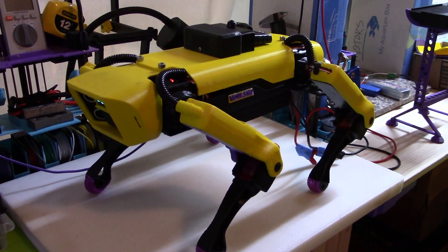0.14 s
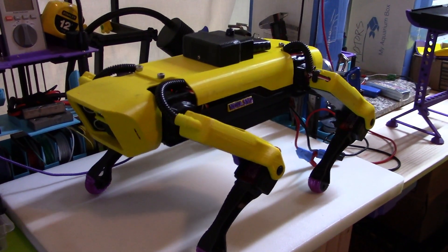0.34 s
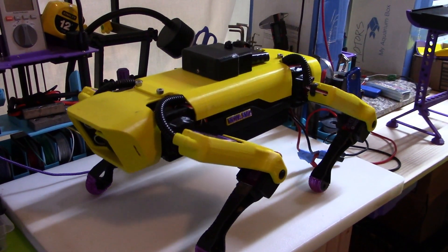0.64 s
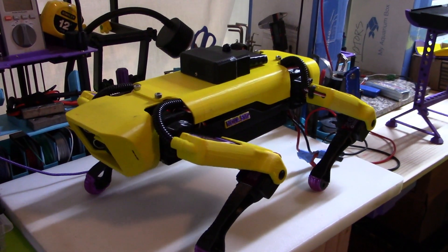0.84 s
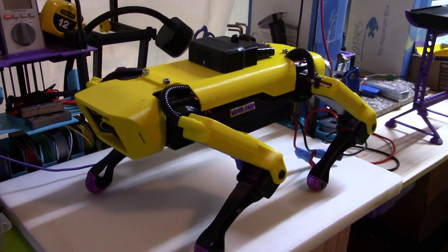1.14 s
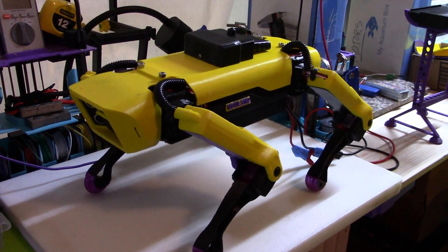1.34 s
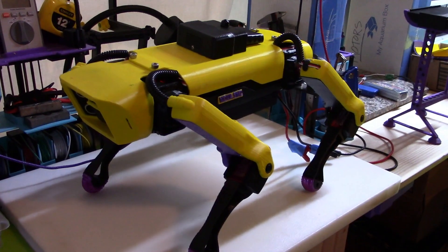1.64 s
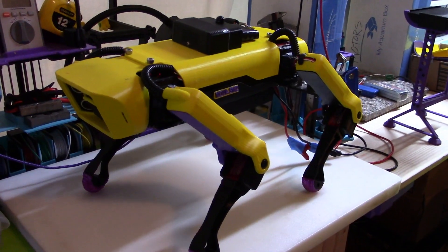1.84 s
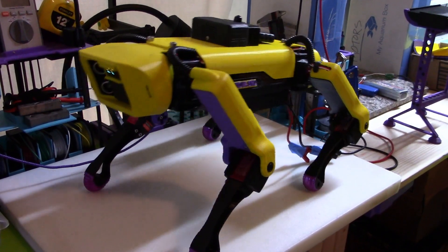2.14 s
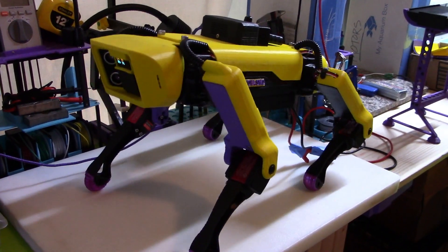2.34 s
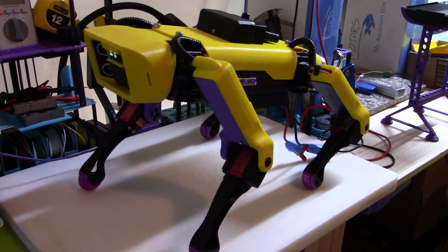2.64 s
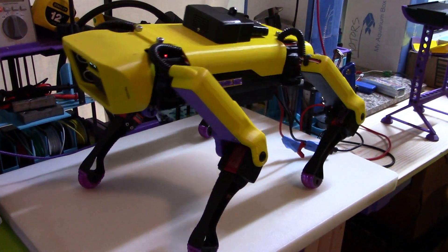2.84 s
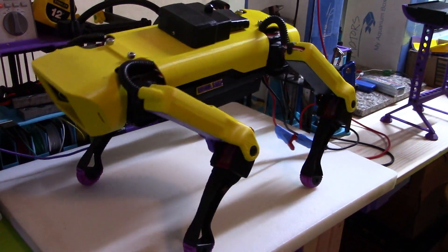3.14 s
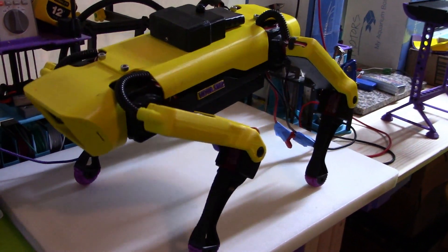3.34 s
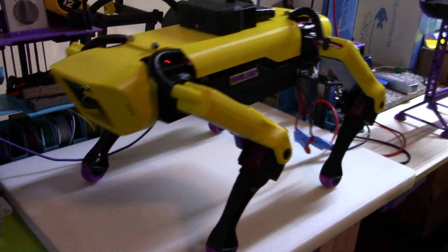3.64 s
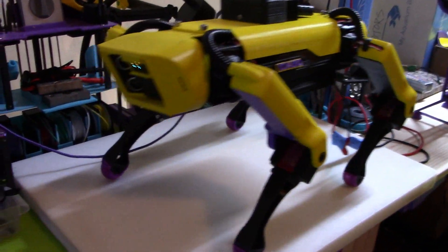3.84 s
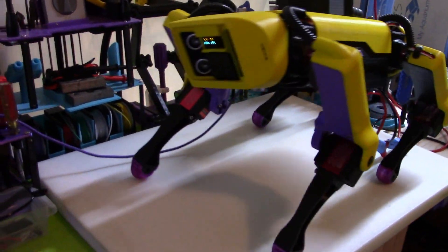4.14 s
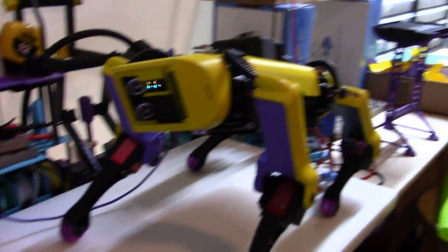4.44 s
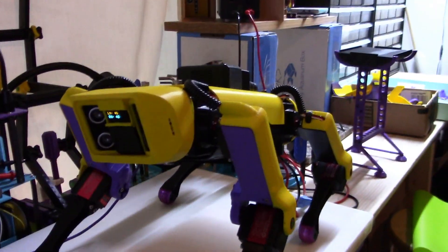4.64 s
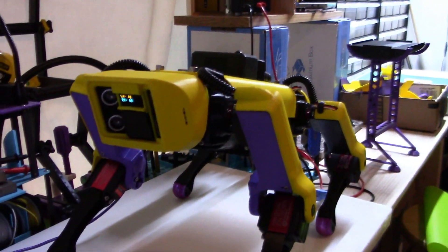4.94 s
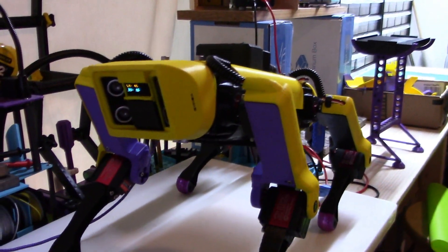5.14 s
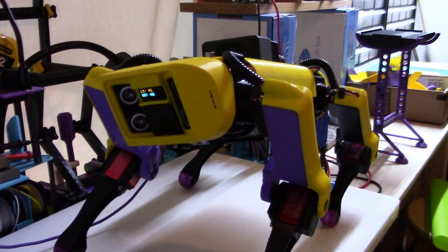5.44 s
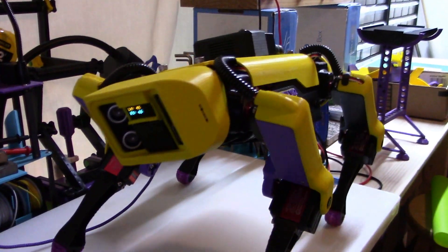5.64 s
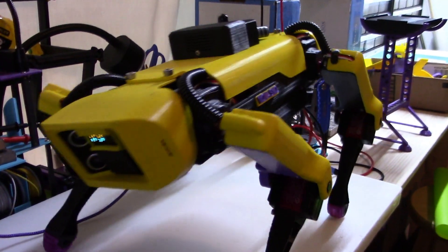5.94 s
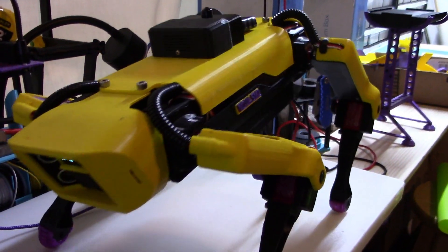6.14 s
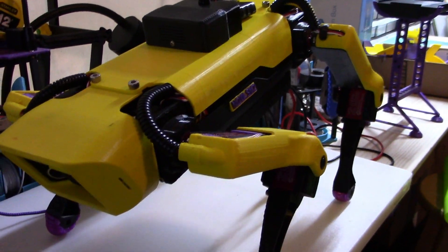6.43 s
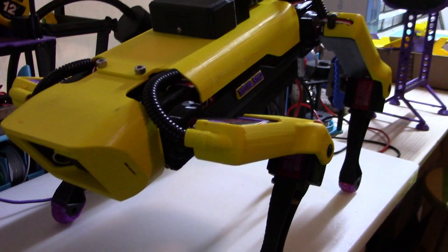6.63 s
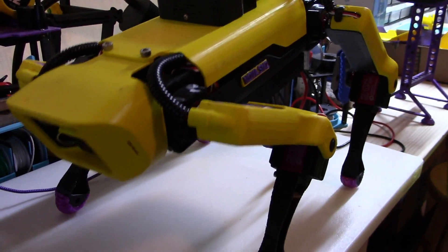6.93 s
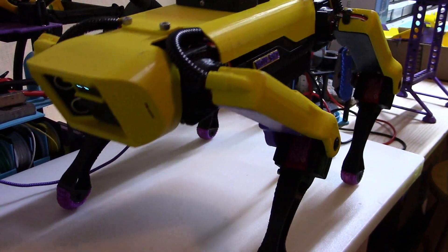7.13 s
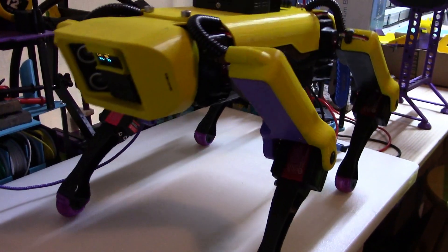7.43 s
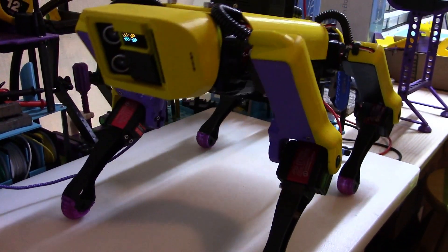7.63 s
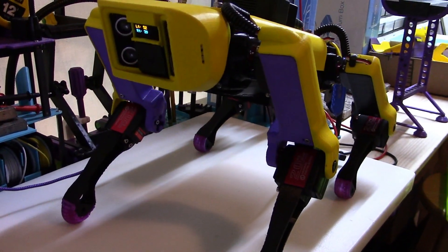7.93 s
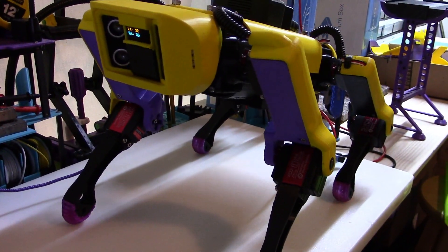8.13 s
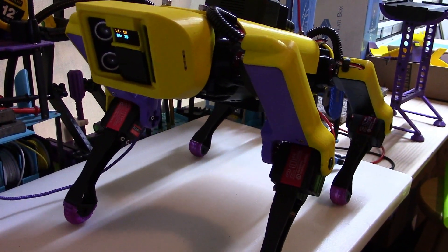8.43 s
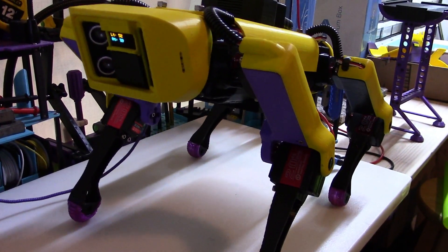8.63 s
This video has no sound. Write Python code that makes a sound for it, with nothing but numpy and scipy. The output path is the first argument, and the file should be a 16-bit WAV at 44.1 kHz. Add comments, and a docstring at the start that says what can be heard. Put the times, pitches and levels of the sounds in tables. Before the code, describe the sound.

Small geared servos whir and rasp in bursts as a plastic robot shifts on a bench, with sharp clicks and faint bird whistles early.

```python
"""In a small room, a four-legged robot crouches, leans and rises on a workbench, heard from close by.
Its geared servos rasp, one burst of tooth noise per motor turn; this drive also excites the plastic shell.
Joints and feet click as short sums of decaying modes in the printed legs.
A songbird whistles faintly outside in gliding sine tones, over the steady filtered noise of the room's air."""
import sys
import numpy as np
from scipy import signal
from scipy.fft import rfft, irfft, next_fast_len
from scipy.io import wavfile
from scipy.ndimage import uniform_filter1d, map_coordinates

SR = 44100
rng = np.random.default_rng(int(sys.argv[2]) if len(sys.argv) > 2 else 0)


def materialize(psi):
    """Save the field psi as 16-bit PCM at rate SR to the path in sys.argv[1].

    A 1-D psi becomes a single channel; in a 2-D psi each row is a channel.
    """
    bounded = np.clip(np.atleast_2d(psi).T, -1, 1)
    quanta = np.round(bounded * 32767).astype(np.int16)
    wavfile.write(sys.argv[1], SR, quanta)


N = 387198  # length [samples]


def amp(db):
    """Logarithmic level: decibels to amplitude gain."""
    return 10 ** (np.asarray(db) / 20)


def unit(x):
    """Mean power: scale a signal to rms 1."""
    return x / np.sqrt(np.mean(x ** 2) + 1e-20)


def along(points, hz):
    """Logarithmic pitch: interpolate (frequency, value) points on a log-frequency axis."""
    f, v = np.transpose(points)
    return np.interp(np.log(hz + 1), np.log(f + 1), v)


def wobble(rate):
    """Slow random modulation: a smooth curve through normal random knots, rate knots a second."""
    knots = rng.standard_normal(int(N * rate / SR) + 4)
    return map_coordinates(knots, [np.arange(N) * rate / SR])


def coloured(x, spectrum):
    """Minimum-phase filtering: a causal body with the given spectrum passes x; the result has rms 1."""
    m = 2 * next_fast_len(N // 2 + SR // 4)
    log_gain = np.log(amp(along(spectrum, np.fft.rfftfreq(m, 1 / SR))))
    # folding the cepstrum onto positive times makes the filter causal
    cepstrum = irfft(log_gain, m)
    cepstrum[1:m // 2] *= 2
    cepstrum[m // 2 + 1:] = 0
    response = np.exp(rfft(cepstrum))
    return unit(irfft(rfft(x, m) * response, m)[:N])


def highpassed(x, hz):
    """High-pass filtering: a third-order Butterworth slope weakens what lies below hz."""
    return signal.sosfilt(signal.butter(3, hz, "highpass", fs=SR, output="sos"), x)


# Spectrum of the steady air noise: (frequency [Hz], relative density [dB per Hz])
AIR_SPECTRUM = [(100, -17), (180, -12), (260, 1.5), (420, 0), (540, 2.5), (1400, -1), (2000, -2),
                (2800, -2.5), (4000, -10.5), (8000, -16), (15000, -24)]


def air():
    """Broadband noise and amplitude modulation: coloured air noise with a faint pulsing chirr near 2 kHz."""
    t = np.arange(N) / SR
    noise = amp(-55.0 + 0.11 * wobble(3.3)) * coloured(rng.standard_normal(N), AIR_SPECTRUM)
    chirr_hz = 2060 + 45 * wobble(120)
    chirr = np.sin(2 * np.pi * np.cumsum(chirr_hz) / SR)
    # 29.5 pulses a second, of uneven strength
    pulsing = np.maximum(np.sin(2 * np.pi * 29.5 * t), 0) ** 2 * amp(5.1 * wobble(20))
    return noise + amp(-67.0) * unit(pulsing * chirr)


# Bird notes: (start [s], length [s], level [dB],
#              pitch at the start [Hz], pitch in the middle [Hz], pitch at the end [Hz])
BIRD_NOTES = [(0, 0.041, -54, 3390, 3230, 3140), (.06, 0.059, -48.5, 3260, 3420, 3530),
              (.066, .05, -55, 3700, 3720, 3780), (.122, 0.048, -44, 4340, 3600, 3130),
              (.156, 0.029, -43, 3180, 3100, 3110), (.255, 0.11, -46, 2730, 2580, 2690),
              (.443, .034, -50.5, 3240, 3210, 2650), (0.458, .094, -54.5, 2660, 2116, 2730),
              (.555, 0.079, -47.5, 2810, 2970, 2660), (.893, 0.053, -45, 3680, 3310, 2920),
              (.985, 0.039, -48, 2920, 2640, 2250), (1.11, 0.055, -49.5, 2480, 2490, 2550),
              (1.3, 0.06, -50, 4280, 4050, 3350), (2.403, 0.039, -46, 3950, 3540, 3350),
              (2.555, .052, -50, 3750, 3890, 4100)]
NOTE_ARCH = 0.57  # exponent of the swell: higher is more pointed


def bird(waver):
    """Frequency modulation of a pure tone: each note swells in one arch and glides along an unsteady bend."""
    out = np.zeros(N)
    for start_s, length_s, db, first_hz, middle_hz, last_hz in BIRD_NOTES:
        u = np.linspace(0, 1, round(length_s * SR))
        parabola = np.polyfit([0, .5, 1], [first_hz, middle_hz, last_hz], 2)
        unsteadiness = uniform_filter1d(rng.standard_normal(SR), size=60)[:len(u)]
        pitch_hz = np.polyval(parabola, u) * (1 + waver * unsteadiness)
        swell = amp(db) * abs(np.sin(np.pi * u)) ** NOTE_ARCH
        whistle = np.sqrt(2) * np.sin(2 * np.pi * np.cumsum(pitch_hz) / SR)
        out[round(start_s * SR):][:len(u)] += swell * whistle
    return out


# Joint and foot clicks: (time [s], level [dB], favoured pitch [Hz], fall away from it [dB per octave])
CONTACTS = [(.113, -12.5, 1017, 2.5), (.607, -33, 1420, 14), (.733, -36.5, 650, 46),
            (1.574, -27.5, 3014, 12), (1.7007, -15.5, 1160, 8), (1.703, -23.5, 2800, 24),
            (2.3559, -24.5, 6950, 4.5), (2.39, -37.5, 660, 42), (2.432, -12.5, 2080, 9.5),
            (2.4428, -17, 6800, 4.5), (3.215, -33.5, 643, 39), (3.849, -34, 669, 45),
            (5.211, -31, 7440, -3.5), (5.228, -27.5, 1100, 24), (5.241, -26, 1070, 23),
            (5.685, -28.5, 1090, 17), (6.4, -33, 664, 41), (6.53, -31, 1115, 19), (7.459, -32.5, 980, 7),
            (7.568, -23.5, 1270, 7), (8.3881, -13, 2210, 7.5), (8.617, -38.5, 670, 47),
            (8.7176, -22.5, 1500, 22)]
# Modes of the plastic legs: (frequency [Hz], relative level [dB], t60 [s])
LEG_MODES = [(333, -9, 0.057), (682, -21, 0.015), (1018, -6.5, 0.023), (1151, -3, 0.019),
             (1654, -9.5, 0.019), (1840, -2.5, 0.013), (2336, 9, 0.0046), (2610, 2.5, 0.0091),
             (3045, -0.5, 0.013), (3810, 14.5, 0.0032), (5830, 17, 0.0026), (7320, 16, 0.004)]


def clicks(crack_db, crack_t60, attack_s):
    """Modal excitation: slack joints and feet knock the legs, favouring modes near each contact's pitch."""
    out, t = np.zeros(N + SR), np.arange(SR // 10) / SR
    hz, mode_db, t60 = np.transpose(LEG_MODES)[:, :, None]
    for start_s, db, pitch_hz, fall_db in CONTACTS:
        octaves_away = abs(np.log2(hz / pitch_hz))
        strength = amp(mode_db + rng.normal(0, 1, hz.shape) - fall_db * octaves_away)
        # one blow starts all modes together
        modes = strength * amp(-60 * t / t60) * np.sin(2 * np.pi * hz * t)
        ring = np.sum(modes, axis=0) * (1 - np.exp(-t / attack_s))
        # the steeper the fall from the pitch, the weaker the noisy crack
        crack_level = amp(crack_db - 2.5 * fall_db - 60 * t / crack_t60)
        crack = crack_level * uniform_filter1d(rng.standard_normal(len(t)), size=2)
        out[round(start_s * SR):][:len(t)] += amp(db) * (ring / abs(ring).max() + crack)
    return highpassed(out[:N], 480)  # parts this small radiate little bass


# Leg moves: (at speed from [s], until [s], spin-up [s], run-down [s],
#             gear rasp [dB], shell hum [dB], full motor speed [turns per s], each helping servo [dB],
#             ring of the leading gearbox [Hz], strength of that ring [dB])
LEG_MOVES = [(.698, .795, .07, .1, -33.5, -52, 420, -9, 8050, 4),
             (.85, 1.02, .1, .15, -39, -52.5, 310, -1, 7900, 6.5),
             (1.09, 1.451, .12, .033, -36.5, -51.5, 335, -8.5, 7600, 3.5),
             (1.574, 1.609, .065, .283, -34.5, -50, 400, -2, 7650, 3),
             (1.724, 2.264, .04, .55, -43, -50, 238, 2.5, 7260, 3.5),
             (2.49, 2.53, .1, .1, -49, -57, 134, -2, 7200, 8),
             (2.671, 2.907, .173, .26, -34, -49, 385, -3.5, 7710, -1.5),
             (3.108, 3.332, .121, .131, -38.5, -50.5, 310, 0, 7300, -3.5),
             (3.377, 4.077, .061, .145, -33, -47, 380, -3.5, 8020, -0.5),
             (4.269, 4.95, .295, .101, -33, -47.5, 385, 0, 8260, 2),
             (5.041, 5.08, .08, .06, -47, -48, 130, -10, 7260, 7),
             (5.135, 5.595, .1, .082, -39.5, -47.5, 300, 2, 8000, -3),
             (5.816, 5.955, .125, .103, -37, -46, 320, 0, 7800, -4),
             (6.089, 6.935, .105, .16, -30.5, -43.5, 328, -4.5, 7380, -1),
             (7.05, 7.12, .1, .12, -46, -41, 160, -6, 7400, -10.5),
             (7.63, 8.465, .092, .043, -30, -46, 350, -4, 7620, -3),
             (8.675, 8.685, .1, .149, -35.5, -49, 235, -9.5, 7005, -1)]
# Brief strains (+) and slack spells (-) as weight shifts between legs: (time [s], rasp change [dB])
WEIGHT_SHIFTS = [(.87, -6), (1.01, 3), (1.13, 1.1), (2.03, 3.8), (2.97, 4), (3.058, 14), (3.17, -7.5),
                 (3.53, -4.5), (3.66, 1.5), (3.69, -5), (3.77, 1.5), (4.11, -3.5), (4.31, 1.5), (5.19, 3),
                 (6.48, -4.5), (6.62, 5), (6.72, -4), (6.77, 2.5), (6.891, 1.5), (7.69, 2.5), (8.31, -4),
                 (8.38, 2.7)]
STRAIN_WIDTH_S = 0.028  # from the peak until the change has shrunk to 1/e
RAMP_DB = 20  # level change over one spin-up or run-down time
CRAWL_PER_S = 85  # motor turns per second while a servo only creeps
HUM_FOLLOWS = 0.14  # the shell hum fades by this share of the rasp's fall
STALL_DB = -12  # drive level, against full drive, below which the hum dies faster


def legs():
    """Power summation: moves ramp, hold and run down; their power shares weight the motors' character."""
    t = np.arange(N) / SR
    (start, end, rise_s, fall_s, rasp_db, hum_db,
     top_speed, helper_db, ring_hz, ring_db) = np.transpose(LEG_MOVES)[:, :, None]
    ramps = np.maximum(start - t, 0) / rise_s + np.maximum(t - end, 0) / fall_s
    drive_db = -RAMP_DB * np.minimum(ramps, 10)
    power = amp(rasp_db + drive_db) ** 2
    total_power = power.sum(axis=0)
    weight = power / total_power
    speed = CRAWL_PER_S + (top_speed - CRAWL_PER_S) * amp(drive_db)
    strain_db = sum(db * np.exp(-((t - s) / STRAIN_WIDTH_S) ** 2) for s, db in WEIGHT_SHIFTS)
    total_rasp_db = 10 * np.log10(total_power) + strain_db
    halt_db = np.minimum(drive_db - STALL_DB, 0)
    # the strongest hum among the moves prevails
    total_hum_db = np.max(hum_db + HUM_FOLLOWS * drive_db + halt_db, axis=0)
    character = [np.sum(weight * control, axis=0) for control in (speed, helper_db, ring_hz, ring_db)]
    return [total_rasp_db, total_hum_db] + character


def gear_train(speed, ring_hz, ring=0.88, burst_s=0.00094, slide_per_speed=0.00072,
               scatter_db=-0.76, grit_db=1.8, jitter=.028):
    """Periodic impact excitation: once a turn the teeth bite and ring the gearbox, over sliding mesh noise."""
    turns = np.cumsum(speed) / SR + jitter * wobble(300) + 2
    since_bite = turns % 1 / speed  # [s]
    # every turn draws its own bite size, ring phase and ring pitch
    per_turn = rng.standard_normal((3, int(turns.max()) + 1))
    size, phase, detune = per_turn[:, turns.astype(int)]
    teeth = unit(rng.standard_normal(N) * amp(grit_db * rng.standard_normal(N)))
    gearbox = ring * np.sin(2 * np.pi * (ring_hz * (1 + 0.02 * detune) * since_bite + phase))
    bite = amp(scatter_db * size) * np.exp(-since_bite / burst_s)
    # a slow motor ticks; a fast one fills the gaps with sliding
    sliding = slide_per_speed * speed * teeth
    return unit((teeth + gearbox) * bite + sliding)


def patchy(x, depth_db):
    """Directional radiation: narrow bands swell and fade as the swinging servo cases show different faces."""
    z = signal.stft(x, nperseg=512)[2]
    field = rng.standard_normal(z.shape)
    for _ in range(2):
        field = uniform_filter1d(field, size=4, axis=0)  # over frequency
        field = uniform_filter1d(field, size=50, axis=1)  # over time
    return unit(signal.istft(z * amp(depth_db * unit(field)), nperseg=512)[1][:N])


# Gearbox and servo case: (frequency [Hz], relative density [dB per Hz])
GEAR_SPECTRUM = [(900, -52.5), (1800, -19), (2400, -11.5), (2850, -2), (3350, -5), (4150, -13.5),
                 (4700, -3.5), (5500, -3.5), (6300, -0.5), (7800, -1), (8600, -1), (9400, -4.5),
                 (10200, -8), (12200, -15.5), (15800, -37.5)]
# Hollow shell: (frequency [Hz], relative density [dB per Hz])
SHELL_SPECTRUM = [(100, -30.5), (200, -23.5), (315, -5.5), (445, -10), (540, -1.5), (670, 2.5), (870, -2.5),
                  (1120, -3), (1550, 5), (1900, -1), (2300, 0), (2800, -23.5), (4000, -13), (9000, -10.5),
                  (15000, -18)]
# Thin motor can: (frequency [Hz], relative density [dB per Hz])
CAN_SPECTRUM = [(1500, -35), (2400, -9.5), (3100, -1), (3600, -4.5), (4500, -10), (7000, -44.5)]
# Motor brushes: (frequency [Hz], relative density [dB per Hz])
BRUSH_SPECTRUM = [(2000, -14), (8000, 0), (10500, 10), (13000, 4), (15800, -10)]
CAN_DB, CAN_KNEE_DB = -4.5, -46  # ring against the rasp; rasp level above which it grows no more
WAKE_S, WAKE_RISE_S = .55, 0.071  # the servos take up their load


def servos():
    """Source and filter: one servo leads, three turn slower or faster, and their drive shakes every body."""
    rasp_db, hum_db, speed, helper_db, ring_hz, ring_db = legs()
    drive = gear_train(speed * amp(.25 * wobble(25)), ring_hz, amp(ring_db))
    power = 1
    for ratio, own_hz in [(.78, 6800), (.94, 7930), (1.17, 9100)]:
        share = amp(helper_db + 0.44 * wobble(4))  # the load shifts from leg to leg
        drive = drive + share * gear_train(ratio * speed * amp(.7 * wobble(12)), own_hz)
        power = power + share ** 2
    drive = patchy(drive / np.sqrt(power), depth_db=0.82)
    t = np.arange(N) / SR
    # position commands kick the motors a little, about 31 times a second
    kick_db = 1.14 * np.sin(2 * np.pi * 31 * t + 1.6 * wobble(6.2)) + 1.14 * wobble(35)
    rasp = amp(rasp_db + kick_db - 1.82) * coloured(drive, GEAR_SPECTRUM)
    # loose panels chatter unevenly as the gears shake them
    chatter_db = 1.09 * wobble(70)
    hum = amp(hum_db + .5 * kick_db + chatter_db - 0.3) * coloured(drive, SHELL_SPECTRUM)
    # the thin sizzle of the brushes levels off once the motors run
    brush_db = np.minimum(rasp_db, -44) - 13
    brushes = amp(brush_db) * coloured(drive * rng.standard_normal(N), BRUSH_SPECTRUM)
    # so does the ring of the motor can
    can_db = np.minimum(rasp_db, CAN_KNEE_DB) + CAN_DB
    can = amp(can_db) * coloured(drive * rng.standard_normal(N), CAN_SPECTRUM)
    powered = np.clip((t - WAKE_S) / WAKE_RISE_S, 0, 1)
    return powered * (rasp + hum + brushes + can)


# Decay of the room's tail: (frequency [Hz], t60 [s])
ROOM_DECAY = [(200, 0.15), (1500, 0.38), (6000, 0.35), (14000, 0.015)]


def room(x, bench_db, tail_db):
    """Reverberation by convolution: bench and shelves answer early and a short tail dies, in changing paths."""
    out = x.copy()
    late = np.pad(x, (SR // 300, 0))[:N]  # the answer starts 1/300 s after the direct sound
    age = np.arange(SR // 4) / SR
    # each fifth of a second gets a newly drawn response
    for start in range(0, N, SR // 5):
        hz, t, z = signal.stft(rng.standard_normal(len(age)), SR, nperseg=256)
        decay = amp(-60 * t / along(ROOM_DECAY, hz)[:, None])
        tail = signal.istft(z * decay, SR, nperseg=256)[1][:len(age)]
        early = rng.standard_normal(len(age)) * amp(-60 * age / 0.05)  # t60 of 0.05 s
        answer = amp(bench_db) * early / np.linalg.norm(early) + amp(tail_db) * tail / np.linalg.norm(tail)
        wet = signal.fftconvolve(late[start:start + SR // 5], answer)[:N - start]
        out[start:start + len(wet)] += wet
    return out


def scene():
    """Superposition: air, bird and robot add up, the same in both channels."""
    robot = servos() + clicks(crack_db=-5.5, crack_t60=0.047, attack_s=0.00088)
    robot_in_room = room(robot, bench_db=-10.5, tail_db=-16.0)
    bird_in_room = room(bird(waver=0.032), bench_db=-2.5, tail_db=-16)
    mono = robot_in_room + bird_in_room + air()
    return np.array([mono, mono])


TOP_HZ = 15800  # band limit of the recorder


def record(dry):
    """Band limiting: the recorder keeps nothing at or above its top frequency."""
    m = next_fast_len(N + SR // 2)
    kept = np.fft.rfftfreq(m, 1 / SR) < TOP_HZ
    return irfft(rfft(dry, m) * kept, m)[:, :N]


dry = scene()
out = record(dry)
materialize(out)
```